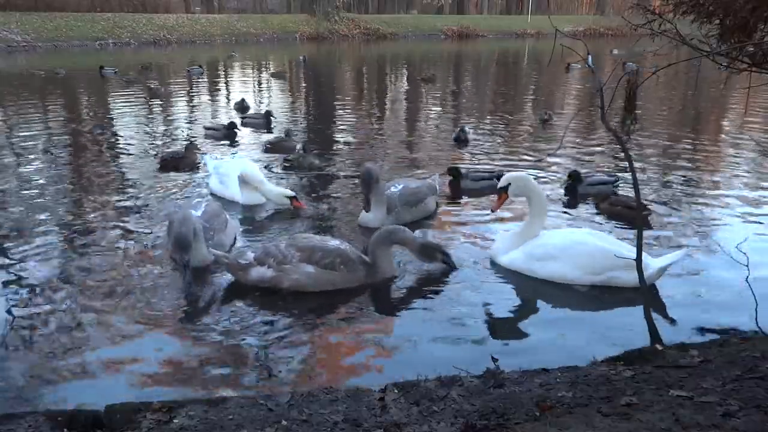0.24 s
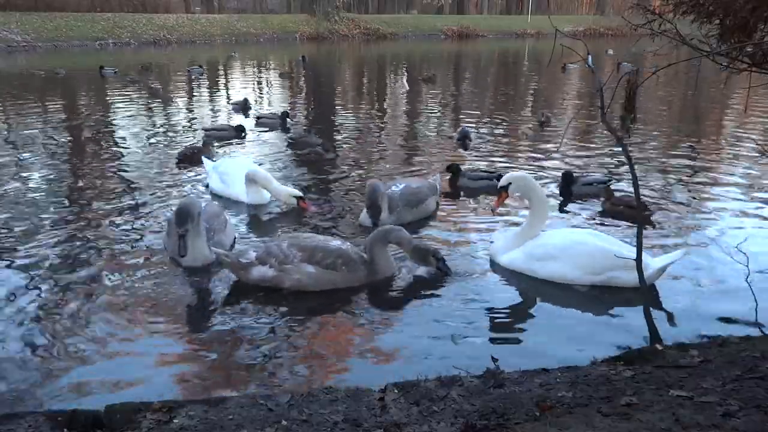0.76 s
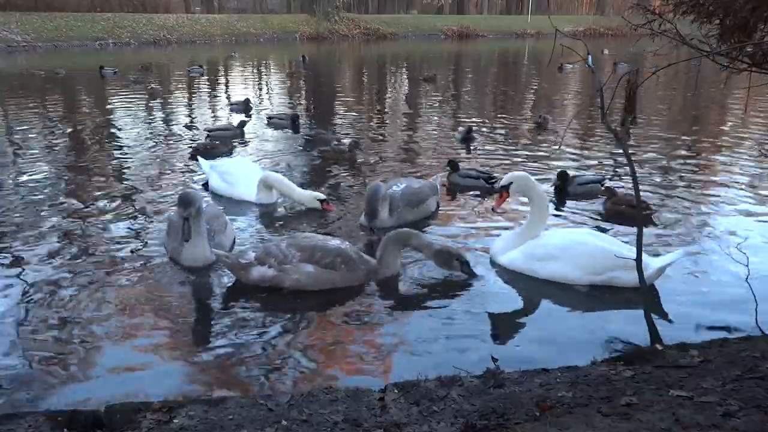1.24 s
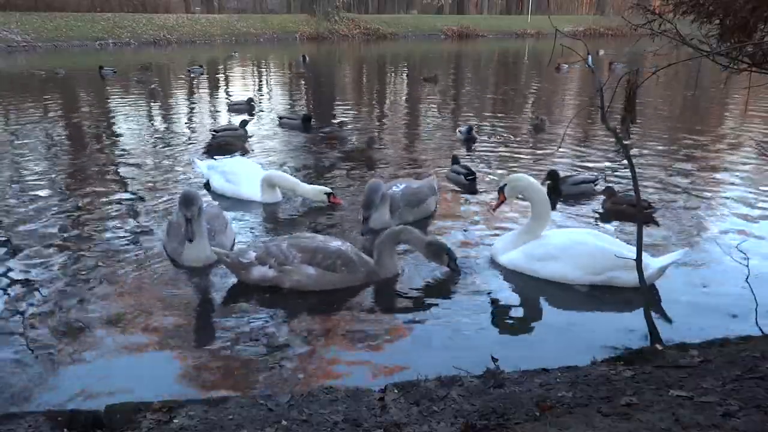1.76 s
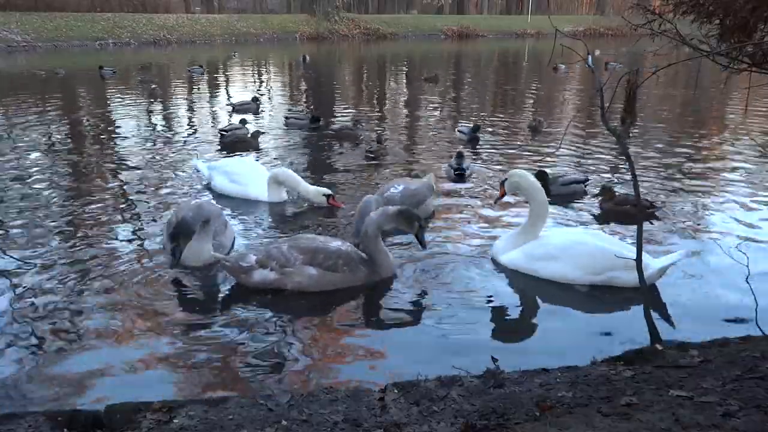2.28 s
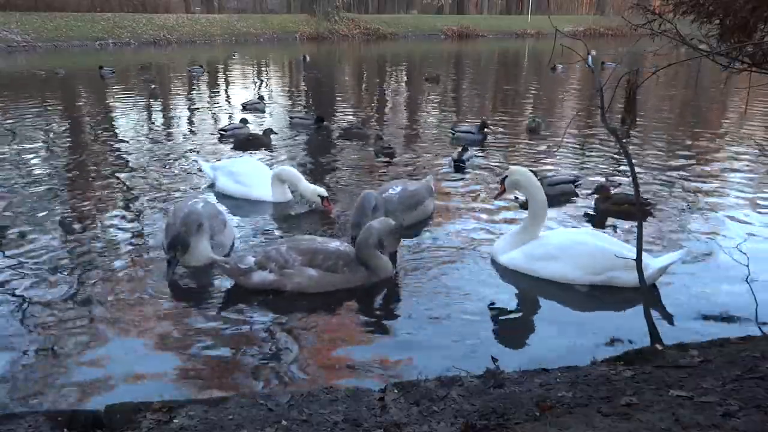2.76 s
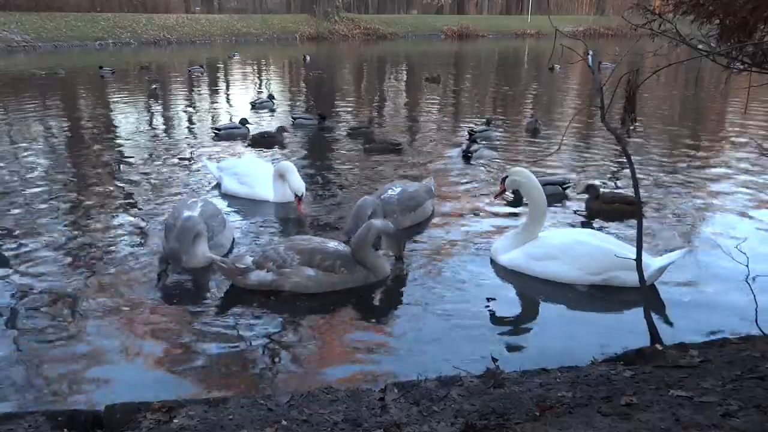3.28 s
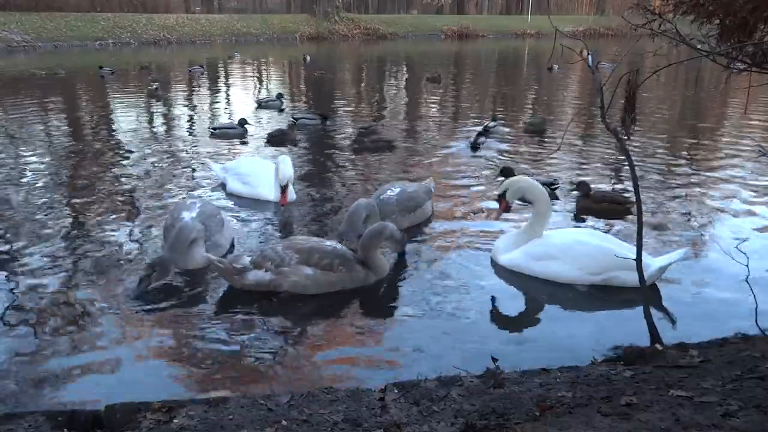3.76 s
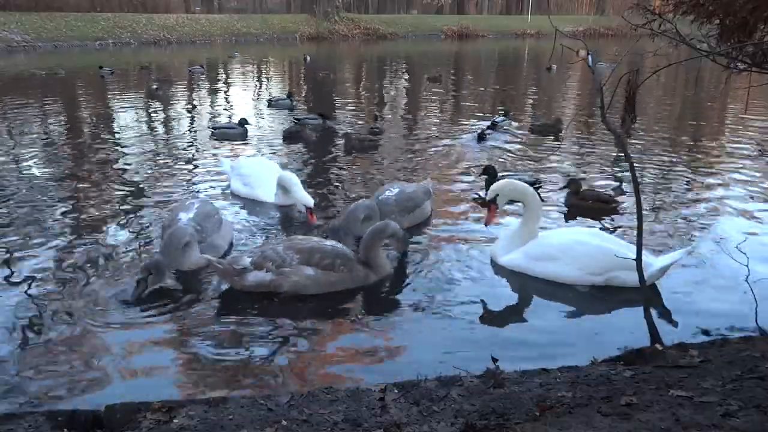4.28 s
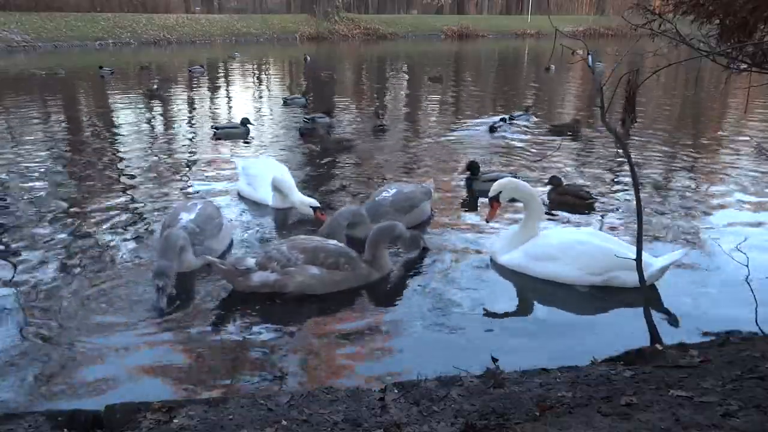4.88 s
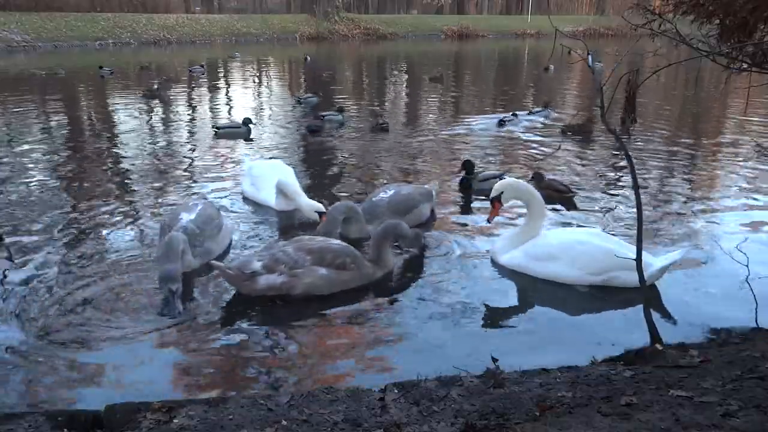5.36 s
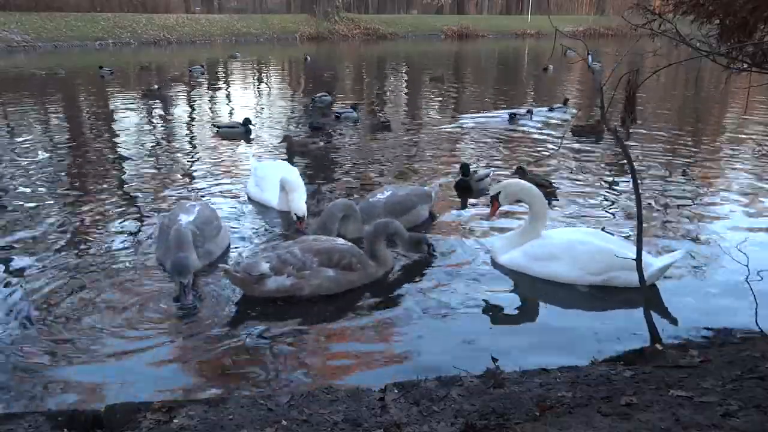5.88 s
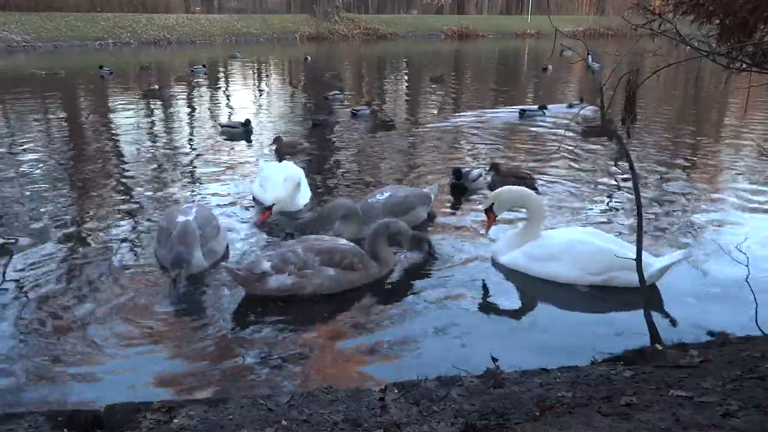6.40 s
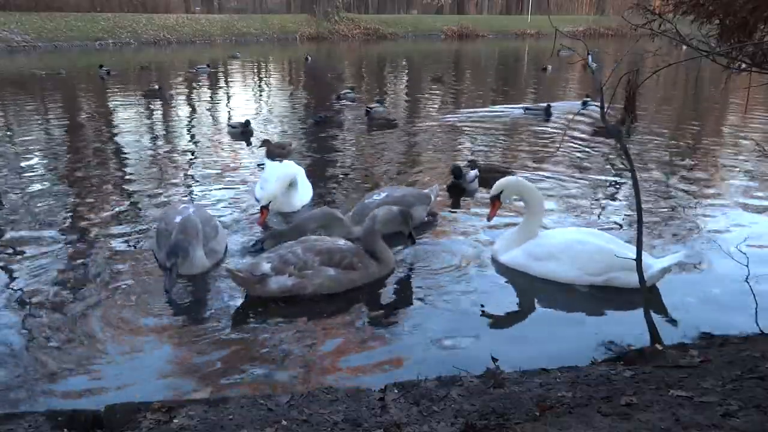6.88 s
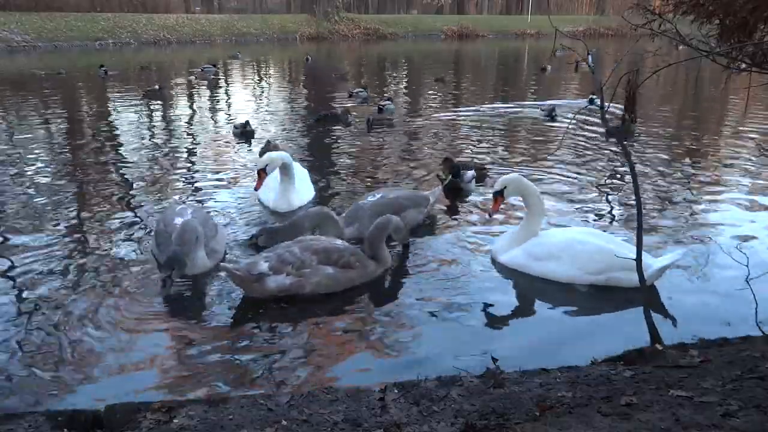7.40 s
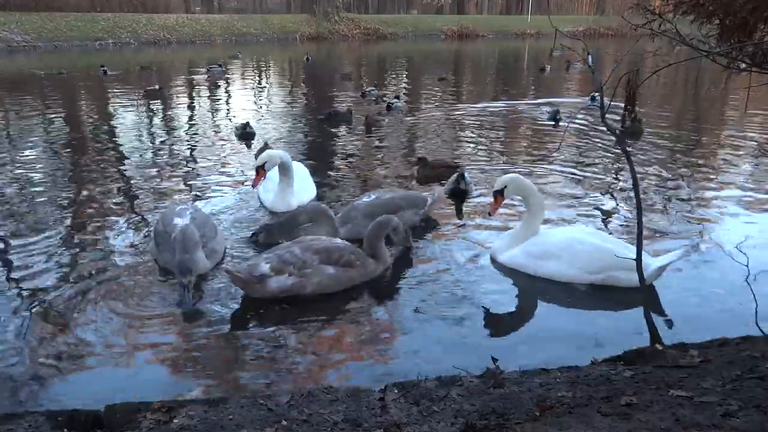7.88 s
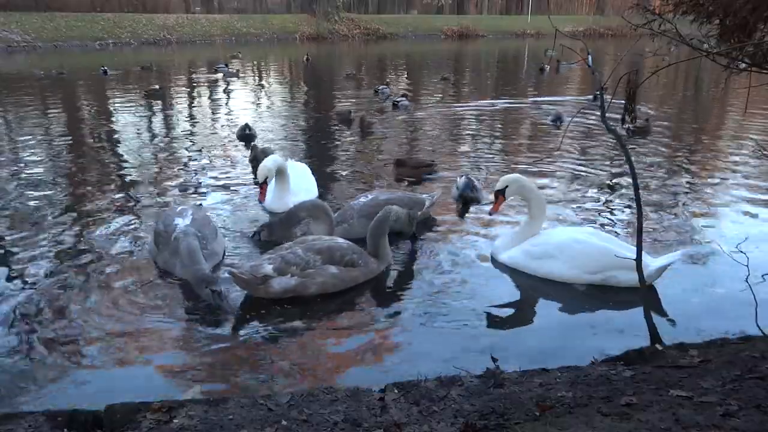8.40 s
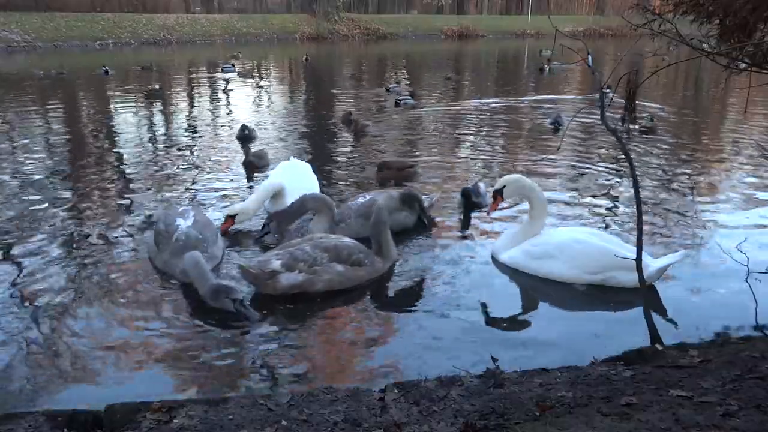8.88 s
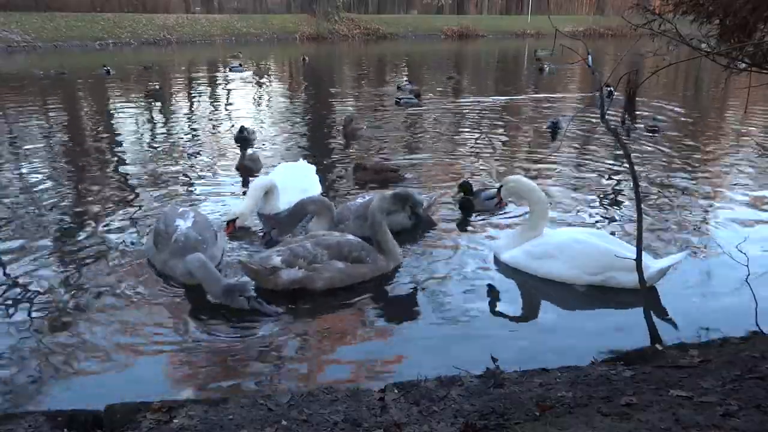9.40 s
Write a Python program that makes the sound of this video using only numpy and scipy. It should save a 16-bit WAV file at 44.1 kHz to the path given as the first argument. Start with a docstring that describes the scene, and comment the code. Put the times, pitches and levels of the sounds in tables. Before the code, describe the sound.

Swans and ducks dabble in a pond with small splashes and plops, then a duck quacks loudly five times over distant traffic rumble.

```python
"""A park pond, the town rumbling behind it. Swans and ducks dabble at floating food: bills smack the
water, trapped air rings as bubbles and droplets scatter. A small bird whistles once and hoarse birds
call from far off. A female mallard gives five loud quacks, each shorter and lower than the last:
slapping membranes and hissing air ring her windpipe and bill, and the trees on the bank answer."""
import sys
import numpy as np
from scipy import signal
from scipy.fft import rfft, irfft, next_fast_len
from scipy.io import wavfile
from scipy.ndimage import uniform_filter1d, map_coordinates

SR = 44100
rng = np.random.default_rng(int(sys.argv[2]) if len(sys.argv) > 2 else 0)


def unload_audio(sound):
    """Save the sound as a 16-bit wav file, at the path given as the first command line argument."""
    columns = np.transpose(np.atleast_2d(sound))
    # keep every value between -1 and 1, then stretch to whole-number steps
    steps = np.round(np.clip(columns, -1, 1) * 32767)
    wavfile.write(sys.argv[1], SR, steps.astype(np.int16))


N = 425565

# tone curves of the far traffic and the open air: freq_hz, gain_db
TRAFFIC_EQ = [(12, -35), (20, -25), (37, -6), (59, -0.5), (91, -2), (123, -6), (159, -5.5), (205, -7),
              (264, -9.5), (454, -19), (595, -21), (900, -24), (1170, -41), (1980, -120)]
AIR_EQ = [(300, -25), (600, 3.5), (900, 4), (1900, -2.5), (2600, -10), (3900, -20), (5400, -21.5),
          (11000, -19.5)]
# fader ride on the small splashes, how busily the birds feed: time_s, level_db
DABBLING_RIDE = [(0, -50.5), (.85, -52), (1.55, -52.5), (1.9, -60.5), (2.35, -63), (2.6, -51.5),
                 (2.85, -59.5), (3.2, -51.5), (3.6, -55.5), (4.1, -51), (4.8, -52.5), (5.15, -49),
                 (5.85, -53), (7.8, -46.5), (8.3, -55), (8.65, -51.5), (8.9, -57.5), (9.4, -53.5)]
# bills smacking the water: start_s, level_db, air_pocket_hz, spray_relative_db
SMACKS = [(0.0966, -27, 2240, -3), (0.3335, -23.5, 2860, -6), (.4229, -8.5, 2450, -8),
          (0.638, -24, 3700, -17), (.796, -15, 4100, -15), (0.9101, -16, 7500, -18),
          (1.5694, -23, 4120, -25), (2.2774, -23, 1590, -11), (2.5312, -22, 8500, -24),
          (2.636, -19.5, 8000, -24), (2.7083, -22, 6200, -16), (3.015, -22.5, 7000, -20),
          (3.252, -22, 4120, -18), (3.9108, -23.5, 2150, -4.5), (4.148, -19, 5900, -16),
          (4.8849, -20.5, 2250, -20), (5.159, -20, 3280, -16), (5.231, -18.5, 1540, -16),
          (5.3975, -22.5, 4400, -1.5), (5.5941, -16, 2720, -16), (5.69, -18.5, 2500, -7),
          (5.7163, -16, 1310, -12.5), (5.7865, -17.5, 1970, -11), (5.8815, -14.5, 5730, -6.5),
          (5.9229, -21, 5450, -3), (5.9667, -22, 1890, -8), (6.1526, -13.5, 3150, -11),
          (7.556, -11, 3400, -6), (7.9647, -22, 5500, -15), (8.0628, -18.5, 4200, -16),
          (8.1647, -22, 9000, -22), (8.344, -22.5, 3600, -2), (9.055, -23.5, 1500, -8.5),
          (9.179, -15.5, 8800, -19), (9.36, -18.5, 1660, -12), (9.5656, -18.5, 1610, -7)]
# single ringing bubbles: start_s, level_db, pitch_hz
PLOPS = [(.449, -21, 2000), (0.727, -22.5, 2570), (.734, -25, 3600), (.915, -24, 2300), (3.15, -23, 3970),
         (3.304, -23, 3050), (3.94, -27, 2000), (3.953, -17, 1700), (3.982, -28, 1280), (4.075, -17, 3080),
         (4.085, -19, 2750), (4.375, -23, 3500), (4.933, -22.5, 1400), (5.259, -20, 2750),
         (5.515, -19.5, 1200), (8.675, -14, 846), (8.946, -19, 1400), (9.37, -23, 1100)]
# far hoarse calls: start_s, length_s, level_db, top_pitch_hz, resonance_ratio
FAR_CALLS = [(5.258, 0.25, -47, 215.7, 0.94), (6.166, 0.13, -44.5, 202.3, 1.04),
             (7.849, 0.32, -43.5, 213.2, 1.11), (8.22, .23, -44, 195.5, 0.99),
             (8.555, 0.28, -41.5, 215.1, 1.05), (9.333, 0.31, -44, 203.5, 1.01)]
# the far birds' throat resonances: freq_hz, gain_db
FAR_THROAT_EQ = [(600, -16), (1200, -5.5), (1650, 4), (2150, 2.5), (2800, -2), (3200, -9), (3700, -22),
                 (5500, -18), (8000, -34)]
# the mallard: start_s, length_s, top_pitch_hz, crest_fraction, level_db, edge_relative_db, noise_share
QUACKS = [(6.312, 0.31, 248.8, 0.52, -18.1, -2, .1), (6.732, .25, 225, .45, -17.2, -6.5, .02),
          (7.092, .21, 209.9, .51, -17.7, -9.8, .02), (7.426, .155, 195.3, .62, -19.5, -10, 0.18),
          (7.725, .134, 181.3, 0.6, -21, -10.5, 0.11)]
# resonances of her windpipe and her open bill: freq_hz, gain_db
THROAT_EQ = [(200, -30), (400, -7), (480, -8), (650, -20), (950, -7), (1200, -10), (1600, -2), (2060, 8.5),
             (2280, 4), (2650, 2), (3100, -7), (4000, -2)]
BILL_EQ = [(3000, -8.5), (4200, 1), (5000, -7), (5600, 8), (6250, -2.5), (7200, -1), (8000, -11),
           (9000, -7.5), (11000, -15)]
# windpipe resonances that hold each membrane slap back: freq_hz, width_hz
PIPE_RINGS = [(1900, 420), (2500, 420), (5700, 900)]
# early reflections off the water and bank: delay_s, gain
REFLECTIONS = [(.0014, 0.094), (.0029, 0.26), (.0046, -0.15), (.0079, .11), (0.0123, 0.17)]
# reverb time of the trees: freq_hz, t60_s
TREE_DECAY = [(200, 0.67), (2000, 0.82), (5000, 0.38), (11000, 0.44)]


def amp(db):
    """Decibels to gain."""
    return 10 ** (np.asarray(db) / 20)


def unit(x):
    """Scale to rms 1."""
    return x / np.sqrt(np.mean(x ** 2) + 1e-20)


def levelled(x):
    """Ride the slow level of a sound to rms 1."""
    return x / np.sqrt(np.abs(uniform_filter1d(x ** 2, size=1300)) + 1e-12)


def along(points, hz):
    """Read a curve of (Hz, value) points on a log frequency axis."""
    freqs, values = np.transpose(points)
    return np.interp(np.log(hz + 1), np.log(freqs + 1), values)


def wobble(knots_per_s, size=N):
    """A smooth random curve."""
    knots = rng.standard_normal(int(size * knots_per_s / SR) + 4)
    return map_coordinates(knots, [np.arange(size) * knots_per_s / SR])


def band(hz, lo, hi, order=8):
    """Gain of a band-pass."""
    return 1 / np.sqrt((1 + (lo / (hz + 1)) ** (2 * order)) * (1 + (hz / hi) ** (2 * order)))


def eq(x, gain):
    """Minimum-phase EQ; gain is a function of frequency."""
    size = 2 * next_fast_len(x.shape[-1] // 2 + 4096)
    cepstrum = irfft(np.log(np.maximum(gain(np.fft.rfftfreq(size, 1 / SR)), 1e-6)))
    cepstrum[1:size // 2] *= 2
    cepstrum[size // 2 + 1:] = 0
    return irfft(rfft(x, size) * np.exp(rfft(cepstrum)), size)[..., :x.shape[-1]]


def swept_eq(x, gain, stretch):
    """An EQ whose resonances all glide by the factor stretch."""
    clock = np.cumsum(stretch)
    warped = map_coordinates(x, [np.interp(np.arange(clock[-1]), clock, np.arange(len(x)))])
    return map_coordinates(eq(warped, gain), [clock])


def add(out, start_s, x):
    """Mix x into out at start_s."""
    first = max(round(start_s * SR), 0)
    part = out[..., first:first + x.shape[-1]]
    part += x[..., :part.shape[-1]]


def panned(x, left_db):
    """Mono to stereo with a level difference."""
    return np.array([x * amp(left_db / 2), x * amp(-left_db / 2)])


def pulses(positions, gains, size):
    """Clicks placed between samples."""
    taps = np.floor(positions).astype(int)[:, None] + np.arange(-7, 9)
    offset = taps - positions[:, None]
    clicks = np.sinc(offset) * np.cos(np.pi * offset / 16) ** 2 * gains[:, None]
    return np.bincount(np.clip(taps, 0, size - 1).ravel(), clicks.ravel(), size)


def noise_bed(curve, side_db):
    """Narrow stereo noise of rms 1, with the lows in the centre."""
    mid, side = eq(rng.standard_normal((2, N)), lambda hz: amp(along(curve, hz)))
    side = amp(side_db) * eq(side, lambda hz: band(hz, 830, 30000, order=1))
    return unit(np.array([mid + side, mid - side]))


def town(rumble_db=-35.6, air_db=-46.0):
    """Far traffic rumbles under the open air's faint hiss; both drift a little in level."""
    drift_db, breeze_db = .6 * wobble(6), .8 * wobble(2.4)
    rumble = amp(rumble_db + drift_db) * noise_bed(TRAFFIC_EQ, side_db=-13)
    return rumble + amp(air_db + breeze_db) * noise_bed(AIR_EQ, side_db=-9.5)


def bubble(hz, cycles, rise, size=900):
    """An air pocket rings for some cycles, rising in pitch as it nears the surface."""
    turns = hz * np.arange(size) / SR
    age = turns / cycles
    envelope = np.exp(-age) * (1 - np.exp(-4 * turns))
    return envelope * np.sin(2 * np.pi * turns * (1 + rise * np.minimum(age, 3) / 2))


def droplets(starts_s, gains, hz, cycles, spread_db):
    """Tiny bubbles burst within a few cycles, each from its own direction."""
    hz, cycles = np.clip(hz, 900, 10500), np.clip(cycles, .4, 4)
    grains = gains[:, None] * bubble(hz[:, None], cycles[:, None], rise=.01, size=300)
    grains *= rng.choice([-1, 1], (len(starts_s), 1))
    where = np.clip((starts_s * SR).astype(int), 0, N)[:, None] + np.arange(grains.shape[1])
    pair = panned(grains, rng.normal(0, spread_db, (len(starts_s), 1)))
    return np.array([np.bincount(where.ravel(), side.ravel(), N)[:N] for side in pair])


def slosh(count=8000):
    """Stirred water fizzes with small bubbles, in quick swells."""
    size, tone = rng.standard_normal((count, 2)).T
    starts_s, pitch_hz = rng.uniform(0, N / SR, count), 4800 * np.exp(.5 * tone)
    fizz = droplets(starts_s, amp(2 * size), pitch_hz, cycles=np.full(count, 3), spread_db=1)
    return unit(fizz * amp(3.5 * wobble(16) + 2 * wobble(60)))


def gurgle(count=260, typical_hz=2400):
    """Small bubbles left by the bills ring briefly and chirp upward."""
    out, variation = np.zeros((2, N)), rng.standard_normal((count, 4))
    for start_s, (size, tone, life, side) in zip(rng.uniform(0, N / SR, count), variation):
        ring = bubble(typical_hz * np.exp(.353 * tone), cycles=7 * np.exp(.33 * life), rise=.052)
        add(out, start_s, panned(amp(4 * min(size, 1.5)) * ring, 4 * side))
    return unit(out)


def dabbling(sips=330, drops_per_sip=13):
    """Nibbling bills and drips: little clumps of crackle over sloshing, gurgling water."""
    sip_s = np.repeat((np.arange(sips) + rng.uniform(-1, 1, sips)) * N / SR / sips, drops_per_sip)
    strength = np.repeat(np.clip(rng.standard_normal(sips), -2, 1.15), drops_per_sip)
    brightness = np.repeat(rng.standard_normal(sips), drops_per_sip)
    lag, tone, size, life = rng.standard_normal((len(sip_s), 4)).T
    delay_s = .004 * np.exp(1.2 * lag)
    pitch_hz = 5200 * np.exp(.34 * brightness + .38 * tone)
    gains = amp(7 * strength + 2 * np.minimum(size, 1.5)) / (1 + delay_s / .014)
    crackle = droplets(sip_s + delay_s, gains, pitch_hz, cycles=1.08 * np.exp(1.1 * life), spread_db=7)
    ride_db = np.interp(np.arange(N) / SR, *np.transpose(DABBLING_RIDE))
    return amp(ride_db) * (amp(3.5) * unit(crackle) + amp(-1.5) * slosh() + amp(-7.5) * gurgle())


def smacks():
    """A bill slaps the surface: a crack on top of a damped air pocket."""
    out, t = np.zeros((2, N)), np.arange(900) / SR
    for start_s, level_db, pocket_hz, _ in SMACKS:
        burst = rng.standard_normal(len(t)) * np.exp(-t / .0017)
        crack = eq(burst, lambda hz: band(hz, 1430, 14200, order=2))
        hit = bubble(pocket_hz, cycles=1.52, rise=.028) + .57 * crack
        hit *= amp(level_db + 1.5) / np.abs(hit).max()
        add(out, start_s + .00098, panned(hit, rng.normal(0, 2.3)))
    return out


def spray(drops_per_smack=24):
    """Each smack scatters droplets; the late ones land softer."""
    start_s, level_db, pocket_hz, spray_db = np.repeat(SMACKS, drops_per_smack, axis=0).T
    lag, size, tone, life = rng.standard_normal((len(start_s), 4)).T
    delay_s = .007 * np.exp(.95 * lag)
    gains = amp(level_db + spray_db - 3 + 2 * size) * np.exp(-delay_s / .064)
    pitch_hz = np.sqrt(pocket_hz * 3600) * np.exp(.544 * tone)
    return droplets(start_s + delay_s, gains, pitch_hz, cycles=1.83 * np.exp(.5 * life), spread_db=1.5)


def plops():
    """Larger bubbles ring out clearly."""
    out = np.zeros(N)
    for start_s, level_db, pitch_hz in PLOPS:
        add(out, start_s + .001, amp(level_db - 3) * bubble(pitch_hz, cycles=3.8, rise=.04))
    return out


def whistle(start_s=3.265, length_s=.194, from_hz=3180, to_hz=3020, level_db=-44.5):
    """A small bird's thin note falls slightly and fades."""
    out, progress = np.zeros(N), np.linspace(0, 1, int(length_s * SR))
    pitch_hz = to_hz + (from_hz - to_hz) * (1 - progress) ** 3 + 25 * wobble(158, len(progress))
    envelope = np.minimum(16 * progress, 1 - progress)
    add(out, start_s, amp(level_db) * envelope * np.sin(2 * np.pi * np.cumsum(pitch_hz) / SR))
    return out


def syrinx(pitch_hz, rasp, jitter, rebound):
    """Membranes slap once a cycle and rebound softly halfway; air hisses through at each opening."""
    size, rasp = len(pitch_hz), np.clip(rasp, 0, 1)
    phase = np.cumsum(pitch_hz) / SR
    cycle = np.arange(int(phase[-1]))
    timing, force, _ = rng.standard_normal((len(cycle), 3)).T
    roughness = np.interp(cycle, phase, rasp)
    slap_phase = cycle + jitter * roughness * timing
    gains = amp((.5 + 3 * roughness) * force)
    slaps = pulses(np.interp(slap_phase, phase, np.arange(size)), gains, size)
    rebounds = pulses(np.interp(slap_phase + .5, phase, np.arange(size)), gains, size)
    buzz = slaps + rebound * uniform_filter1d(rebounds, size=7)
    hiss = rng.standard_normal(size) * np.exp(-2.5 * (phase % 1))
    return np.sqrt(1 - rasp) * unit(buzz), np.sqrt(rasp) * unit(hiss)


def far_birds():
    """Hoarse calls from across the pond: buzz and breath ring the throat on an arch of pitch."""
    out = np.zeros(N)
    for start_s, length_s, level_db, top_hz, resonance_ratio in FAR_CALLS:
        arch = np.abs(np.sin(np.linspace(0, np.pi, int(length_s * SR))))
        buzz, hiss = syrinx(top_hz * (.76 + .24 * arch), np.full(len(arch), .15), jitter=.02, rebound=.3)
        call = eq(buzz + hiss, lambda hz: amp(along(FAR_THROAT_EQ, hz / resonance_ratio)))
        add(out, start_s, amp(level_db) * arch ** .47 * unit(call))
    return out


def duck_voice(buzz, hiss, opening, edge_db):
    """The windpipe's low notes stay put while throat and bill resonances glide with the opening."""
    chest = eq(buzz + .51 * hiss, lambda hz: amp(along(THROAT_EQ, hz)) * band(hz, 170, 1243))
    breathy = buzz + .55 * hiss
    throat = swept_eq(breathy, lambda hz: amp(along(THROAT_EQ, hz)) * band(hz, 1200, 3500), opening)
    # air always rasps in the edge; the sharpest part of each slap varies most, so it crackles
    crackle = (buzz + .6 * hiss + .65 * unit(hiss)) * amp(1.6 * wobble(160, len(buzz)))
    edge = swept_eq(crackle, lambda hz: amp(along(BILL_EQ, hz)) * band(hz, 3500, 13000), opening ** .55)
    return levelled(throat) + amp(-11) * levelled(chest) + amp(edge_db) * levelled(edge)


def windpipe_ring(x):
    """The windpipe stores each slap near its resonances and lets it out late, filling the gaps."""
    for freq_hz, width_hz in PIPE_RINGS:
        radius = np.exp(-np.pi * width_hz / SR)
        poles = [1, -2 * radius * np.cos(2 * np.pi * freq_hz / SR), radius ** 2]
        x = signal.lfilter(poles[::-1], poles, x)  # all-pass
    return x


def mallard(attack_s=.028, release_s=.042, settle_s=.03, bill_lag_s=.008):
    """Each quack is one arch of effort: pitch, resonances and edge rise together; the slack ends rasp."""
    bend_hz_per_s, rest_hz = 1030, 217  # at rest_hz the resonances sit unshifted
    effort_db_per_octave, edge_db_per_octave = 12, 17
    out = np.zeros(N)
    for start_s, length_s, top_hz, crest, level_db, edge_db, noise_share in QUACKS:
        t = np.arange(round(length_s * SR)) / SR
        pitch_at = lambda time: top_hz - bend_hz_per_s * (time - crest * length_s) ** 2 / length_s
        sag_octaves = np.log2(top_hz / pitch_at(t))
        rasp = noise_share + .4 * np.exp(-t / settle_s) + .3 * sag_octaves
        buzz, hiss = syrinx(pitch_at(t), rasp, jitter=.03, rebound=.5)
        opening = (pitch_at(t - bill_lag_s) / rest_hz) ** .42
        voice = duck_voice(buzz, hiss, opening, edge_db - edge_db_per_octave * sag_octaves)
        envelope = np.minimum(t / attack_s, 1) * np.minimum((length_s - t) / release_s, 1)
        effort = amp(level_db - effort_db_per_octave * sag_octaves)
        add(out, start_s, effort * envelope * windpipe_ring(voice))
    return out


def early_reflections(x, side_lag_s=.00004):
    """Bounces off water and bank comb the sound, arriving from left and right in turn."""
    out = x.copy()
    for k, (delay_s, gain) in enumerate(REFLECTIONS):
        for side in range(2):
            add(out[side], delay_s + side_lag_s * ((k + side) % 2), gain * x[side])
    return out


def trees(send, predelay_s=.025):
    """The wooded bank scatters sound back; the treble dies first."""
    hz, t, spectra = signal.stft(rng.standard_normal((3, SR)), SR, nperseg=256)
    decay = amp(-60 * t / along(TREE_DECAY, hz)[:, None])
    tails = signal.istft(spectra * decay, SR, nperseg=256)[1]
    tail = tails[0] + .8 * tails[1:]  # a shared centre plus one tail a side
    tail = np.pad(tail / np.linalg.norm(tail[0]), ((0, 0), (int(predelay_s * SR), 0)))
    return signal.fftconvolve(send[None], tail, axes=1)[:, :N]


def scene():
    """The mix: near duck and water nearly dry, far birds deep in reverb, the town underneath."""
    duck = early_reflections(panned(mallard(), left_db=2.5))
    far = far_birds() + whistle()
    water = early_reflections(smacks() + spray() + plops() + dabbling())
    reverb = trees(amp(-16) * duck.mean(axis=0) + amp(-1.5) * far + amp(-23.5) * water.mean(axis=0))
    return duck + amp(2.5) * far + water + reverb + town()


def record(dry):
    """A brick-wall high cut on the whole mix."""
    size, cutoff_hz = next_fast_len(N + SR // 2), 11150
    high_cut = band(np.fft.rfftfreq(size, 1 / SR), 1, cutoff_hz, order=90)
    return irfft(rfft(dry, size) * high_cut, size)[:, :N]


dry = scene()
out = record(dry)
unload_audio(out)
```